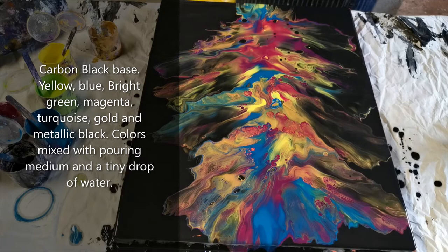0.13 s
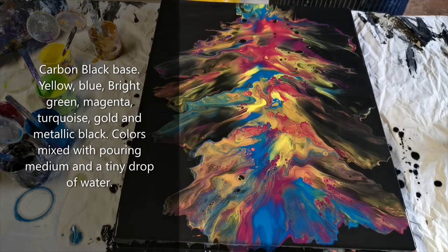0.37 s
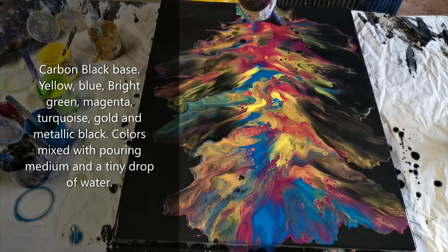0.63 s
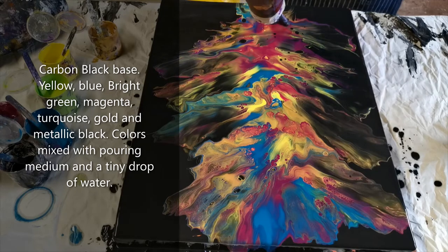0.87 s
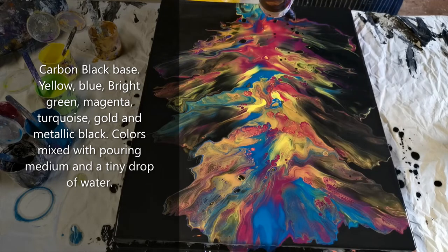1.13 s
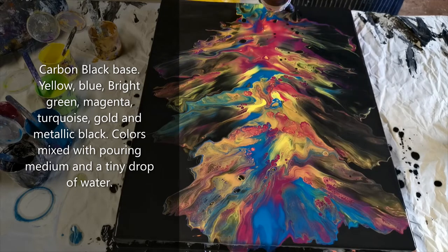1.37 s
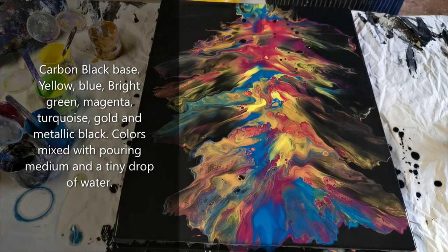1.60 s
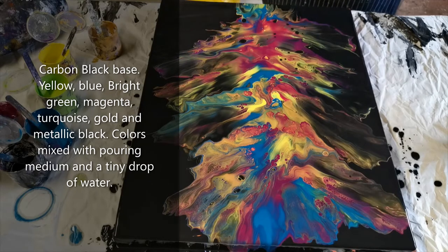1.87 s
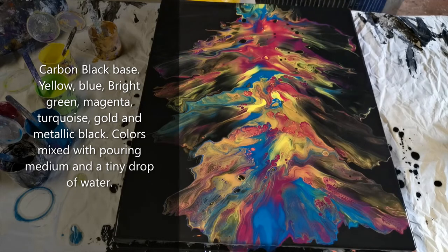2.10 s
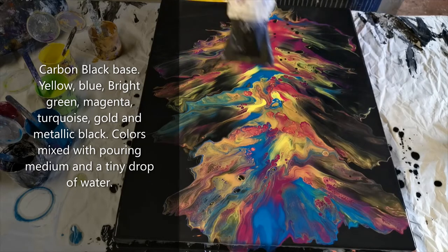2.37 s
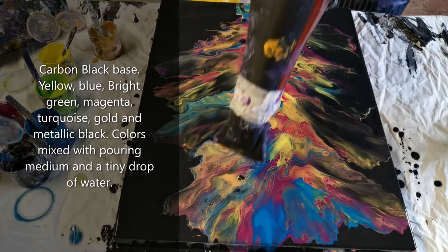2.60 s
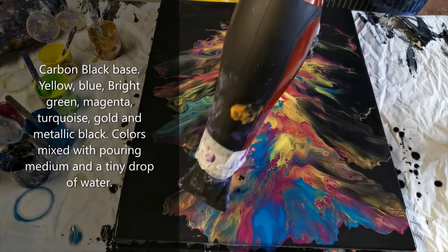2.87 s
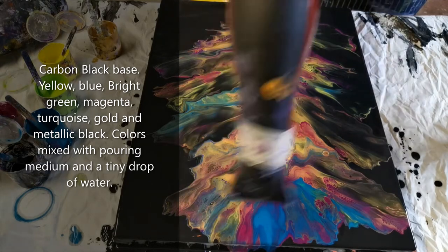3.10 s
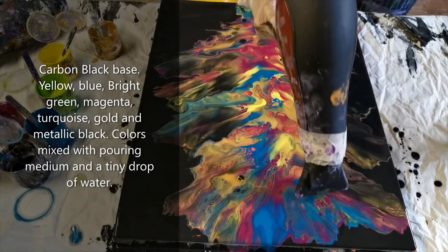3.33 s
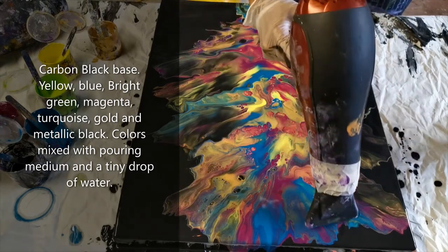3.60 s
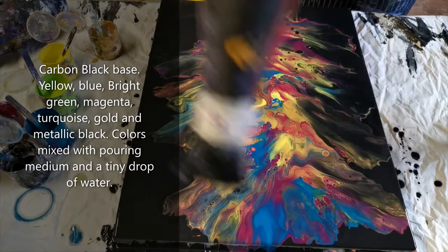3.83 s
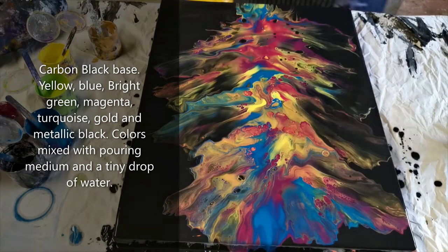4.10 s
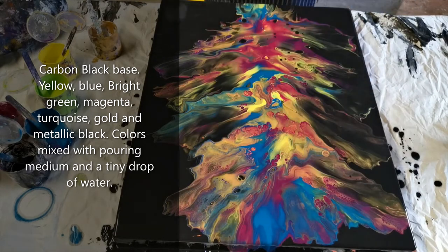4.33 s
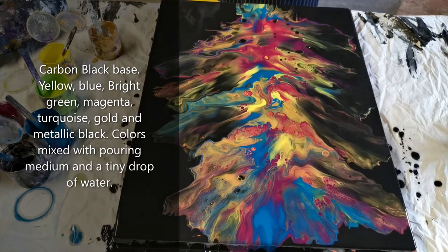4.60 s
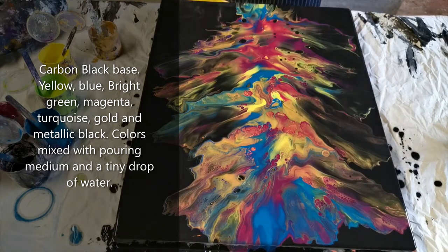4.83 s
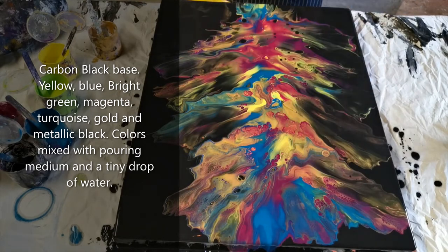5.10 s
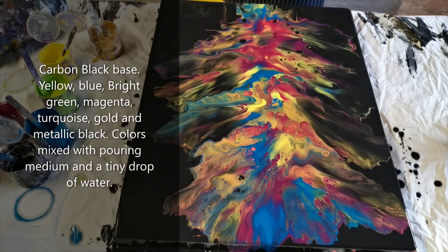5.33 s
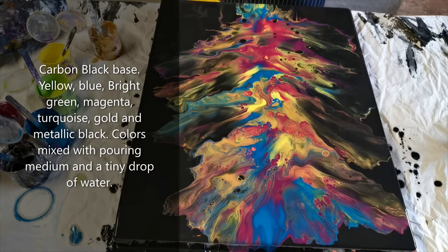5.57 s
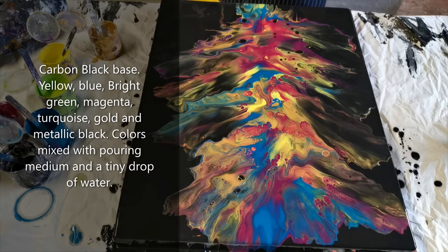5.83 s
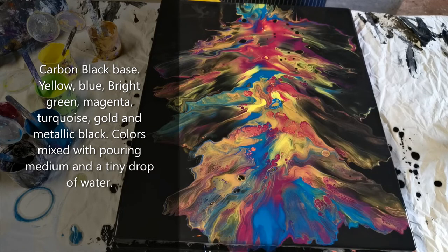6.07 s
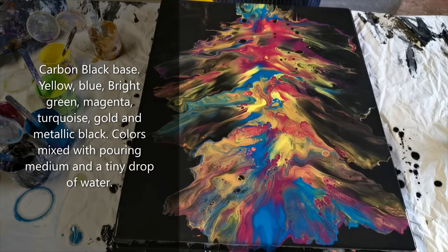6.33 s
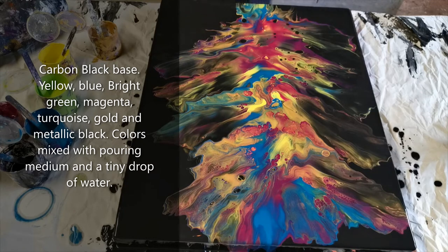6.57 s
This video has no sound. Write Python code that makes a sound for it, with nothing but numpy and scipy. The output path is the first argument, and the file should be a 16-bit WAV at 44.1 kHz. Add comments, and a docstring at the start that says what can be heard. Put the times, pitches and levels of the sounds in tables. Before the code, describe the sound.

A hand-held hair dryer blows steadily over a table top indoors, whining and rushing, then sags, revs up briefly and switches off.

```python
"""Hair dryer over a table top

A hand-held hair dryer indoors is swept to and fro over a table top, held aside, sags in speed, revs up
briefly and is switched off. The fan whines at four times the shaft speed, as sines on one shaft phase.
Its rush of air is three noises through shared moving resonances, growing as powers of the fan speed.
Decaying noise answers the whine as the walls do, and low shaped noise is the hum of a quiet room."""
import sys
import numpy as np
from scipy import signal
from scipy.fft import rfft, irfft
from scipy.io import wavfile
from scipy.ndimage import uniform_filter1d, map_coordinates

SR = 44100
rng = np.random.default_rng(int(sys.argv[2]) if len(sys.argv) > 2 else 0)


def wav_record(signal):
    """Record a signal, one row per channel, as 16-bit PCM in the file named by sys.argv[1]."""
    frames = np.transpose(np.atleast_2d(signal))
    bounded = np.clip(frames, -1, 1)
    # unit amplitude maps onto the largest positive 16-bit level
    quanta = np.round(bounded * 32767).astype(np.int16)
    wavfile.write(sys.argv[1], SR, quanta)


def convert_level_to_amplitude(level_db):
    """Map a level in decibels to its linear amplitude factor."""
    exponent = np.asarray(level_db, float) / 20
    return 10 ** exponent


N = 295470
FRAME = 2048  # samples in a noise-shaping frame
HZ = np.fft.rfftfreq(FRAME, 1 / SR)[:, None]
REV_S = 5.925  # start of the brief rev

# how far the dryer is turned from over the table (0) to held aside (1): time_s, aside_share
TURNED_ASIDE = [(0, 0), (4.3, 0.019), (4.8, 0.98), (6.7, 0.94)]


def unit(x):
    """Normalization: scales a signal to rms 1."""
    return x / np.sqrt(np.mean(x ** 2) + 1e-20)


def along(points, hz):
    """Logarithmic pitch scale: interpolates (Hz, value) points over log frequency."""
    point_hz, value = np.transpose(points)
    return np.interp(np.log(hz + 1), np.log(point_hz + 1), value)


def curves(rows, t):
    """Piecewise-linear motion: reads each column after the first at positions t in the first."""
    position, *columns = np.transpose(rows)
    return [np.interp(t, position, column) for column in columns]


def wobble(rate):
    """Slow random modulation: a smooth curve through random knots, rate of them a second."""
    knots = rng.standard_normal(int(N * rate / SR) + 4)
    return map_coordinates(knots, [np.arange(N) * rate / SR])


def speed_hz(t):
    """Rotational inertia: the blade tone sags, climbs in the rev, settles and coasts down once switched off."""
    # blade tone of the running fan, steady and then sagging: time_s, blade_tone_hz
    running = [(0, 1240), (1, 1241), (2.6, 1236), (3.6, 1239), (4.7, 1248), (4.85, 1243), (5, 1224),
               (5.3, 1207), (5.45, 1185), (5.6, 1149), (5.75, 1137), (5.92, 1127)]
    ease_s, off_s = 6.122, 6.522  # end of the rev, switch-off
    initial_climb_hz_per_s, spin_up_s = 2600, .25
    settle_hz, settle_s, coast_s, inertia_s = 1142, .118, .25, .05

    def since(start_s):
        return np.maximum(t - start_s, 0)

    rev_time = np.clip(t - REV_S, 0, ease_s - REV_S)
    climb = initial_climb_hz_per_s * spin_up_s * (1 - np.exp(-rev_time / spin_up_s))
    revved = curves(running, t)[0] + climb
    settled = settle_hz + (revved - settle_hz) * np.exp(-since(ease_s) / settle_s)
    coasting = settled * np.exp(-since(off_s) / coast_s)
    return uniform_filter1d(coasting, size=round(inertia_s * SR))


def whine():
    """Blade-passing tone: blades set the fourth shaft order, with its octave and weaker shaft orders."""
    # the whine fades in and out as the dryer turns and moves: time_s, blade_tone_db, octave_db
    moving_levels = [(0, -43, -51), (.2, -43, -57), (.32, -47.5, -62), (.45, -38, -46), (.8, -38, -45.5),
                     (1, -37, -45), (1.1, -40, -52), (1.3, -39, -49.5), (1.55, -43.5, -46),
                     (1.72, -38.5, -51), (1.83, -40, -51), (1.97, -47.5, -52), (2.07, -41.5, -48.5),
                     (2.3, -49, -50), (2.45, -51.5, -55), (2.63, -41.5, -70), (2.76, -37.5, -41.5),
                     (3.13, -39.5, -40), (3.19, -43, -51), (3.3, -48, -58), (3.4, -42, -48),
                     (3.5, -46, -50), (3.8, -41.5, -45.5), (3.9, -42.5, -51), (4, -56, -55),
                     (4.15, -43, -58), (4.3, -42, -65), (4.42, -42, -51.5), (4.8, -43, -48),
                     (4.9, -47, -43), (5, -58, -51), (5.1, -48.5, -52), (5.3, -49, -54), (5.4, -43.5, -48),
                     (5.6, -47.5, -53), (5.7, -45, -70), (5.9, -45.5, -58)]
    # from the rev on, the room lifts some pitches and swallows others: blade_tone_hz, blade_tone_db, octave_db
    swept_levels = [(580, -57.5, -80), (835, -50, -80), (990, -51, -62), (1140, -49, -60), (1179, -48, -51),
                    (1215, -49.5, -55), (1275, -37, -52), (1326, -42, -58), (1365, -53, -45),
                    (1433, -31, -39), (1450, -41.5, -48.5)]
    # weaker multiples of the shaft speed: shaft_order, level_db (from the smoothed blade tone)
    weak_orders = [(1, -27), (5, -21), (6, -16), (10, -17), (11, -22), (20, -31)]
    blades = 4
    t = np.arange(N) / SR
    hz = speed_hz(t)
    levels_db = np.where(t < REV_S, curves(moving_levels, t), curves(swept_levels, hz))
    blade_db, octave_db = uniform_filter1d(levels_db, size=SR // 50)
    unsteady_hz = hz * (1 + 0.0015 * wobble(12))
    shaft = 2 * np.pi * np.cumsum(unsteady_hz) / (SR * blades)  # radians
    # the sound reaches one port a little earlier
    shaft = shaft + np.outer([1, -1], .022 + .012 * wobble(1.5))
    tone = convert_level_to_amplitude(blade_db + 0.85 * wobble(30)) * np.sin(blades * shaft)
    tone += convert_level_to_amplitude(octave_db + 1.4 * wobble(20)) * np.sin(2 * blades * shaft)
    # the casing turns away when held aside
    near_db = uniform_filter1d(blade_db, size=SR // 3) - 6 * curves(TURNED_ASIDE, t)[0]
    for order, db in weak_orders:
        tone += convert_level_to_amplitude(near_db + db + 2.3 * wobble(3.67)) * np.sin(order * shaft)
    return np.sqrt(2) * tone  # a sine at 0 dB has rms 1


def hump(hz, width_hz):
    """Resonance: a bell-shaped outline over frequency, 1 at its centre and half at half its width."""
    return 1 / (1 + (2 * (HZ - hz) / width_hz) ** 2)


def resonances_db(t):
    """Resonant coloration: gap, casing, near walls and passing bands lift or dip the air noise."""
    # resonance of the gap between nozzle and table: time_s, centre_hz, lift_db
    table_gap = [(0, 983, 13), (1.4, 934, 2), (1.8, 940, 10), (3, 880, 6.5), (3.4, 887, 13), (3.9, 852, 9),
                 (4.15, 976, 16.5), (4.3, 990, 9), (4.6, 1056, 10), (6.5, 1066, 9), (6.7, 902, -12)]
    # casing and near walls: centre_hz, width_hz, over_table_lift_db, held_aside_lift_db
    fixed_resonances = [(315, 75, 7, 4), (365, 170, 0.5, -2), (445, 31, 9, 3.5), (576, 37, 7, 12.5),
                        (709, 105, -3, 9.5), (791.7, 18.8, 15.5, -6.5), (827, 22, -7.5, 13.5),
                        (950, 15, 0.5, 9), (1088, 48, 8.5, 1), (1337, 65, 8.5, 13), (1575, 31, 4, 7),
                        (2200, 78, 2.5, 9.5), (2764, 150, 1.5, 7.5), (3060, 92, -0.5, 4.5),
                        (3300, 250, 0, -4.5), (3663, 37, 4.5, 10.5), (4023, 210, 2.5, 7.5),
                        (4294, 110, 5, 6.5), (5400, 74, 1.5, -6), (6650, 1200, -0.5, 1),
                        (7900, 440, -2.5, -4.5), (10900, 200, 2.5, -3)]
    # bands that swell, slide and fade as the dryer moves: start_s, end_s, from_hz, to_hz, peak_lift_db
    passing_bands = [(0, 0.51, 4600, 3770, 6), (.08, 0.29, 3470, 3160, 9), (0.448, .95, 3350, 3360, 5.5),
                     (.5, 1.8, 2100, 2200, 4), (.5, 1.6, 3460, 4040, 6.5), (.6, 1.7, 6700, 8230, 5),
                     (1.1, 1.9, 5550, 5400, 2.5), (1.2, 1.63, 4050, 4230, 8), (1.6, 1.96, 3170, 3600, 7),
                     (2.05, 2.63, 3300, 3120, 7.5), (2.4, 4.3, 1450, 1530, 12), (2.5, 4.14, 770, 760, 3.5),
                     (2.5, 3.1, 5500, 5200, 3.5), (3.15, 3.8, 3153, 3180, 5), (3.3, 3.7, 5300, 5600, 5.5),
                     (3.9, 4.3, 2994, 4700, 7.5), (5.97, 6.15, 1067, 1035, 6.5),
                     (6.56, 6.9, 4600, 4795, 26)]
    aside = curves(TURNED_ASIDE, t)[0]
    gap_hz, gap_db = curves(table_gap, t)
    lift = gap_db * hump(gap_hz, width_hz=66)
    for hz, width_hz, over_db, aside_db in fixed_resonances:
        lift += (over_db + aside * (aside_db - over_db)) * hump(hz, width_hz)
    for start, end, from_hz, to_hz, db in passing_bands:
        way = np.clip((t - start) / (end - start), 0, 1)
        swell = np.sqrt(np.sin(np.pi * way) + 1e-9)
        centre_hz = from_hz + way * (to_hz - from_hz)
        lift += db * swell * hump(centre_hz, width_hz=5.8 * np.sqrt(from_hz))
    return lift


def rush(spectrum, lift_db, patchy_db):
    """Partial coherence: two noises mix into two ports, shaped by resonances, dappled at random, rms 1."""
    # left-right correlation of the noise before its lift: frequency_hz, correlation (no unit)
    likeness = [(30, .62), (60, .76), (130, .83), (290, .98), (1200, .98), (2000, .955), (3100, .82),
                (6800, .5), (15000, .34)]
    # phase by which left leads right: frequency_hz, lead_rad
    phase_lead = [(100, 0), (1500, .05), (3000, .2), (6000, .35), (9000, .6), (10500, 2), (15000, 3.1)]
    # level of left over right: frequency_hz, difference_db
    port_tilt = [(60, 0.0), (240, -0.5), (950, 1), (3770, 2), (15000, -5)]
    _, t, (a, b) = signal.stft(rng.standard_normal((2, N)), SR, nperseg=FRAME)
    dapple = uniform_filter1d(rng.standard_normal(a.shape), size=5, axis=0)
    dapple = unit(uniform_filter1d(dapple, size=11, axis=1))
    mix_angle = np.arccos(np.clip(along(likeness, HZ), -1, 1)) / 2
    port = np.exp(.5j * along(phase_lead, HZ)) * convert_level_to_amplitude(along(port_tilt, HZ) / 2)
    direct = np.cos(mix_angle) * a * convert_level_to_amplitude(lift_db(t))
    # sound from the walls is less coloured
    scattered = np.sin(mix_angle) * b * convert_level_to_amplitude(.75 * lift_db(t))
    pair = np.array([(direct + scattered) * port, (direct - scattered) / port])
    pair *= convert_level_to_amplitude(along(spectrum, HZ) + patchy_db * dapple)
    return unit(signal.istft(pair, SR, nperseg=FRAME)[1][:, :N])


def air():
    """Aerodynamic noise: jet roar, nozzle rush and intake hiss, their pressures powers of fan speed."""
    # air at full speed, louder as the dryer comes near: time_s, intake_hiss_db, roar_over_hiss_db
    air_levels = [(0, -47, 3.5), (.2, -46, 3), (.4, -45, 3.5), (.6, -42, 0), (1.05, -42, 0), (1.45, -43, 1),
                  (1.9, -44, 0.5), (2.2, -46, 1), (2.45, -44.5, 4), (2.8, -43.5, 3), (3, -42.5, 1),
                  (3.36, -44.5, 3.5), (3.86, -43, 3), (3.95, -45, 2.5), (4.15, -47, 2), (4.3, -47, 2.5),
                  (4.85, -47, 2), (5.9, -46.5, 2.5)]
    # jet roar, relative density per Hz: frequency_hz, density_db
    roar_spectrum = [(120, -57), (200, -26.5), (428, -13), (648, -11), (908, -5), (1150, -7.5), (1220, -3),
                     (1320, -13.5), (1430, -11), (2000, -18.5), (2600, -42), (4400, -120)]
    # nozzle rush, relative density per Hz: frequency_hz, density_db
    nozzle_spectrum = [(1000, -45), (1700, -6), (2340, -3.5), (2440, -3), (2550, -2.5), (2620, -6),
                       (3200, -4), (5000, -10.5), (6500, -29), (11000, -120)]
    # intake hiss, relative density per Hz: frequency_hz, density_db
    hiss_spectrum = [(4200, -17), (4800, -12), (5400, 1), (5950, -3.5), (7400, -1.5), (9200, -9.5),
                     (10900, -3.5), (12500, -5), (14200, -2.5), (15700, -8.5)]
    full_speed_hz, nozzle_over_hiss_db = 1240, 2.5
    roar_power, nozzle_power, hiss_power = 1.9, 3.63, 3.1  # exponents of pressure against speed
    t = np.arange(N) / SR
    hiss_db, roar_db = curves(air_levels, t)
    pace = speed_hz(t) / full_speed_hz
    gust = wobble(14)  # turbulence shared by all layers
    roar_gain = pace ** roar_power * convert_level_to_amplitude(roar_db + 0.34 * gust + 1.03 * wobble(8))
    roar = roar_gain * rush(roar_spectrum, resonances_db, patchy_db=1.6)
    nozzle_gain = pace ** nozzle_power * convert_level_to_amplitude(nozzle_over_hiss_db + 0.39 * gust + 0.72 * wobble(5.3))
    nozzle = nozzle_gain * rush(nozzle_spectrum, resonances_db, patchy_db=1.62)
    hiss_gain = pace ** hiss_power * convert_level_to_amplitude(0.3 * gust)
    hiss = hiss_gain * rush(hiss_spectrum, resonances_db, patchy_db=2.6)
    return convert_level_to_amplitude(hiss_db) * (roar + nozzle + hiss)


def walls(x):
    """Reverberation: convolution with decaying noise, different at each port, answers for the room."""
    t = np.arange(SR // 4) / SR
    tail = rng.standard_normal((2, len(t))) * convert_level_to_amplitude(-60 * t / .3)  # decays at 60 dB in 0.3 s
    tail /= np.linalg.norm(tail[0])
    return signal.fftconvolve(x[None], tail, axes=1)[:, :N]


def room():
    """Stationary noise: a low steady hum shaped in frequency, with no resonant lift."""
    # room hum, relative density per Hz: frequency_hz, density_db
    hum_spectrum = [(12, -30), (20, 0.5), (69, -4.5), (86, -5), (102, 3), (171, -9), (188, 1), (221, -6),
                    (260, -16), (340, -43), (570, -120)]
    return convert_level_to_amplitude(-66) * rush(hum_spectrum, np.zeros_like, patchy_db=1.7)


def scene():
    """Superposition: the dryer drifts a little left and right by level difference; the room stays."""
    # where the dryer is, as left over right: time_s, difference_db
    position = [(0.0, 0), (0.76, 0.4), (2.2, 0), (3.1, -1.5), (4, -0.5), (5.2, 0.5), (5.7, -.8), (6.7, -1)]
    tone = whine()
    pan_db = curves(position, np.arange(N) / SR)[0]
    dryer = (tone + air()) * convert_level_to_amplitude([pan_db / 2, -pan_db / 2])
    answer = convert_level_to_amplitude(-24) * walls(tone.mean(axis=0))
    return dryer + answer + room()


def roll_off(x):
    """The treble ends steeply here."""
    return signal.sosfilt(signal.butter(12, 16090, fs=SR, output="sos"), x)


def record(dry):
    """Band limitation: the camera keeps nothing from 15730 Hz upward."""
    in_band = np.fft.rfftfreq(N, 1 / SR) < 15730
    kept = irfft(rfft(dry) * in_band, N)
    return roll_off(kept)


dry = scene()
out = record(dry)
wav_record(out)
```